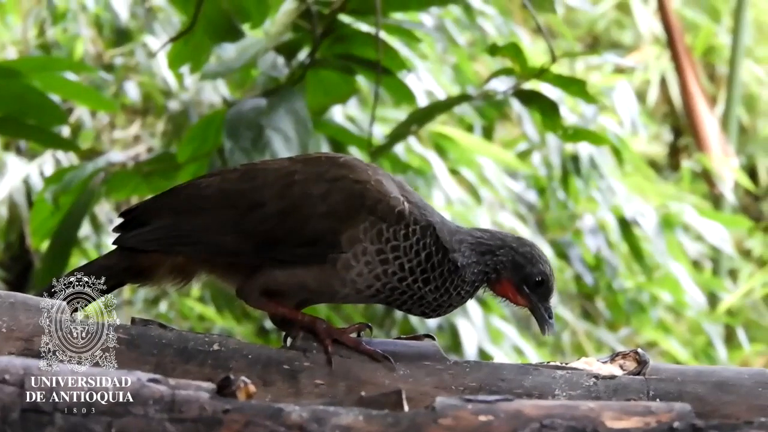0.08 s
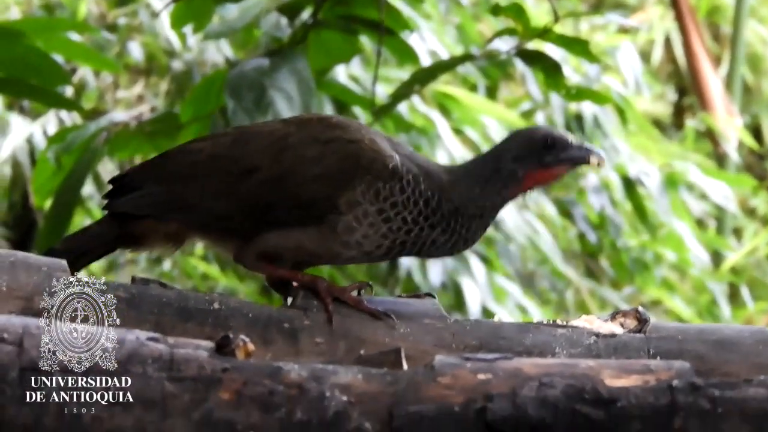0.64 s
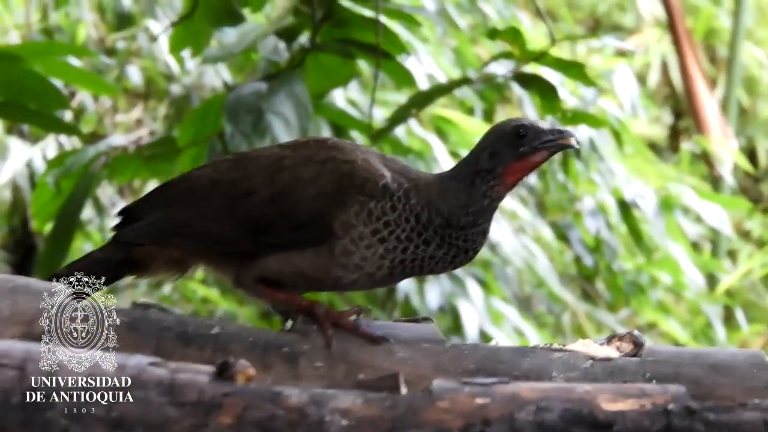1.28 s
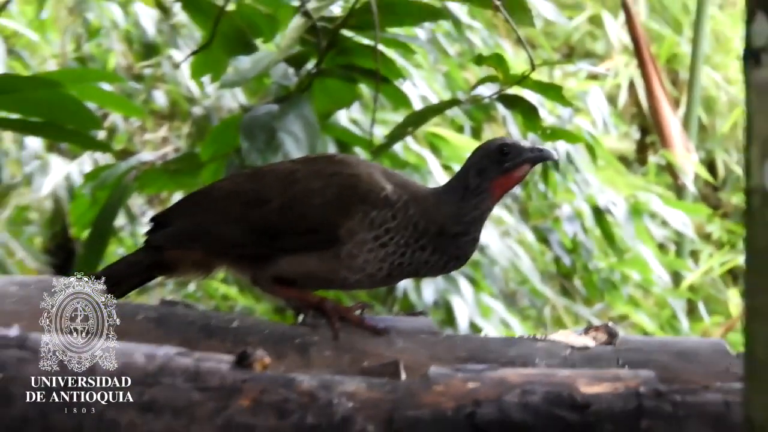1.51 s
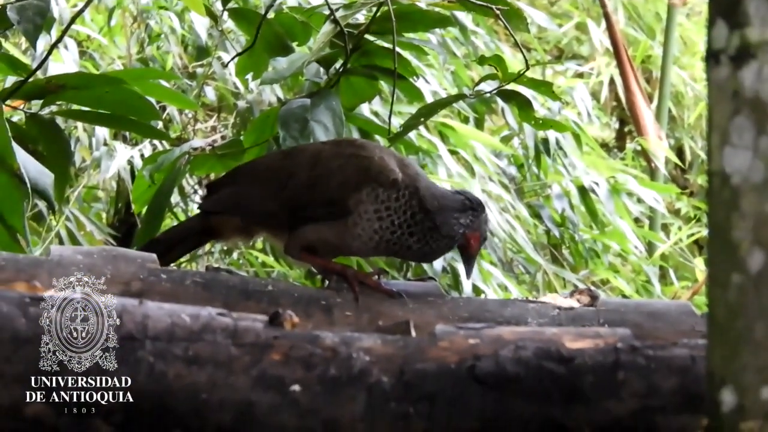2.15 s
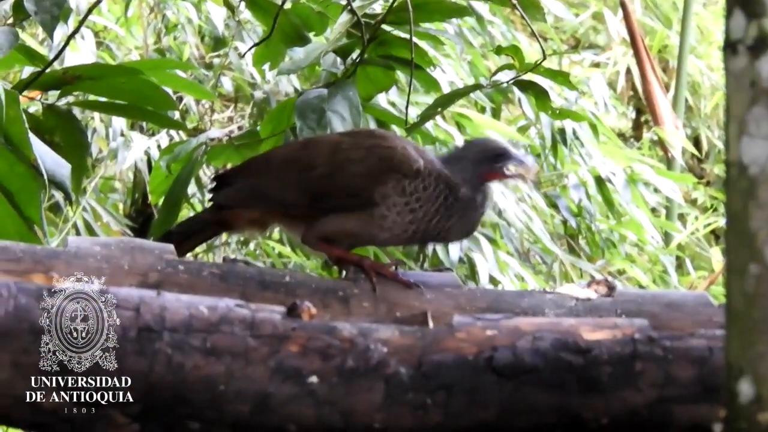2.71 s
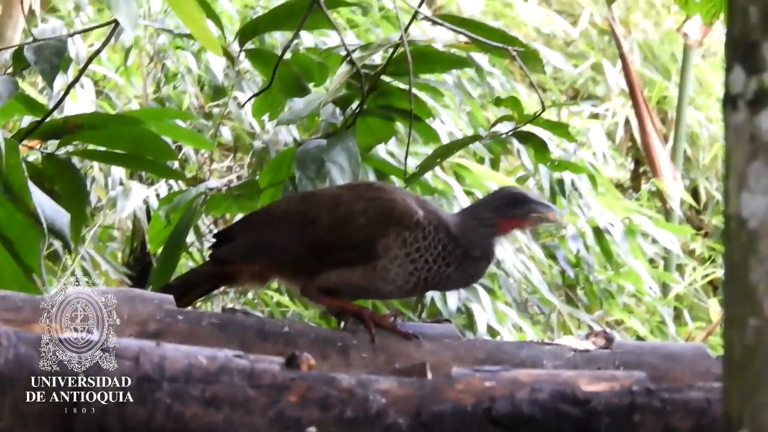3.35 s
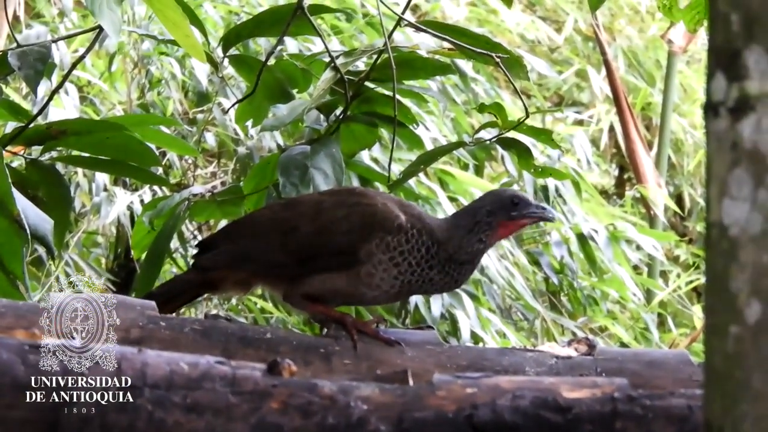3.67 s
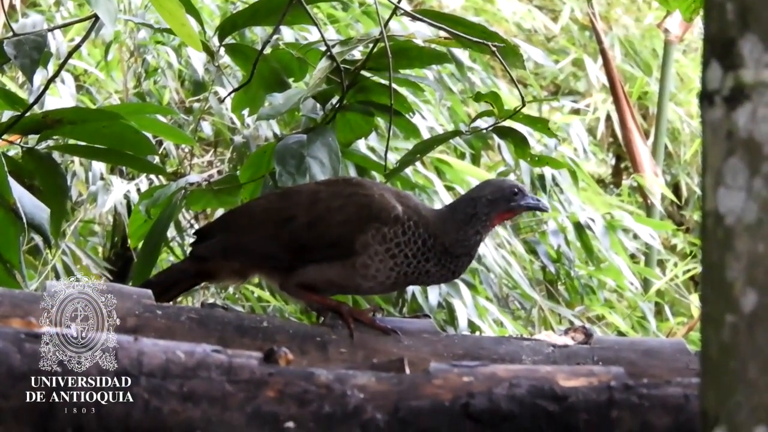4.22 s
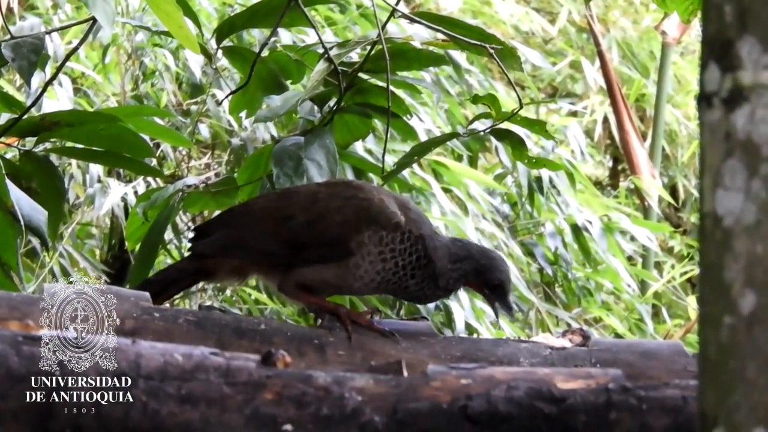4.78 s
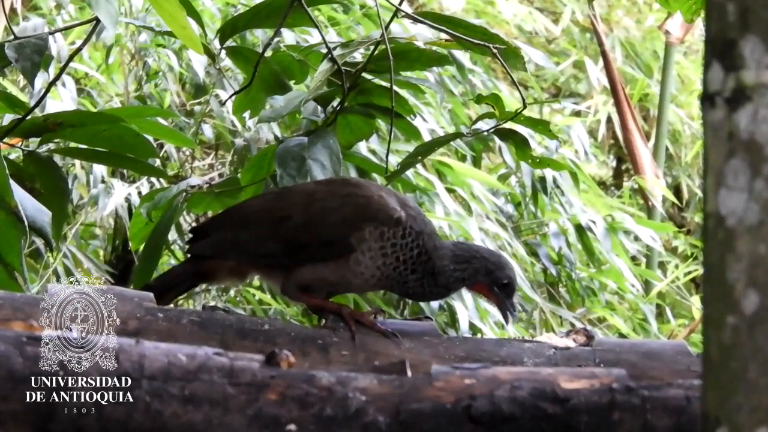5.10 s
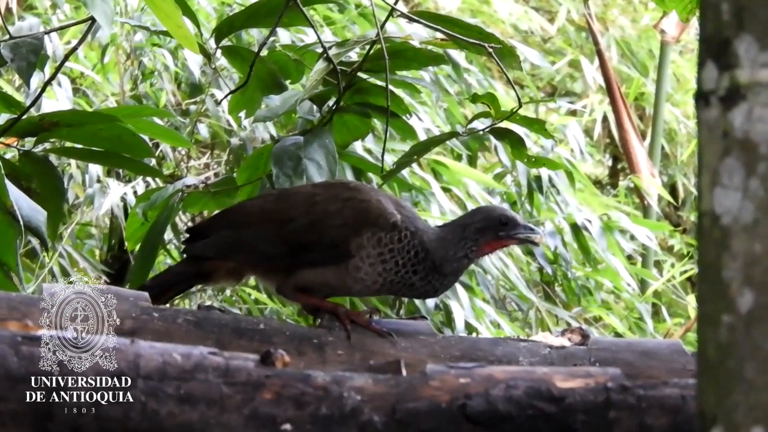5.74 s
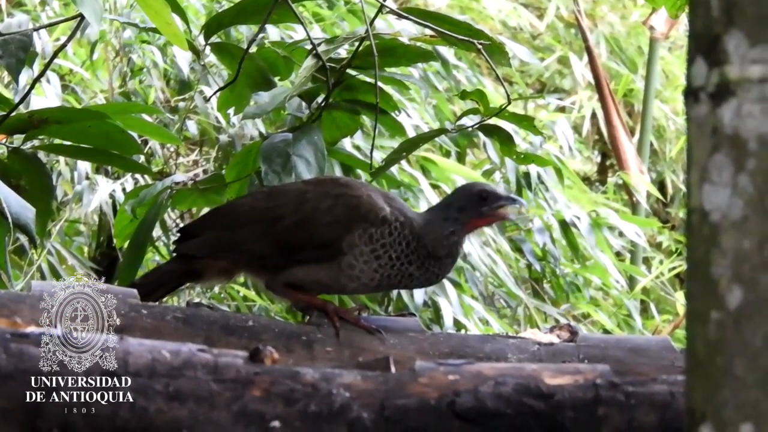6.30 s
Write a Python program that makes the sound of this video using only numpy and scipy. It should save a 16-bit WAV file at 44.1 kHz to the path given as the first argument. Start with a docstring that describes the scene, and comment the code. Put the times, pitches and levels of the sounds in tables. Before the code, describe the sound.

Heard from one spot among the trees, two birds squawk back and forth, a hoarse voice overlapping a shriller honking one, each giving a lone note and then a quick rasping cluster. A feeding bird taps dryly on a log at the start, again with a single knock about a second in, and once more near the end. A high insect drone and the soft rush of distant water and leaves continue behind.

```python
"""A quick run of dry taps from a feeding bird, then two chachalacas duet in a humid forest.
A hoarse low voice and a shriller one trade short rasping syllables: syrinx pulses ringing in the throat.
Timber near the microphone scatters the calls, and the foliage behind gives them a bright tail.
The feeding bird taps again and knocks once on a log; leaves brush, and there are two soft low bumps.
Insects drone near 6 kHz throughout, over the rush of distant water and leaves."""
import sys
import numpy as np
from scipy import signal
from scipy.fft import rfft, irfft
from scipy.io import wavfile
from scipy.ndimage import uniform_filter1d

SR = 44100
rng = np.random.default_rng(int(sys.argv[2]) if len(sys.argv) > 2 else 0)


def transcribe(u):
    """Save the signal u as a 16-bit wav file named by the first command-line argument.

    u: samples, shape (n,) or (channels, n), limited to [-1, 1]; the rate is SR.
    q: integer samples, one column per channel.
    """
    v = np.clip(np.atleast_2d(u).T, -1, 1)
    q = np.round(v * 32767).astype(np.int16)
    wavfile.write(sys.argv[1], SR, q)


N = 289296
TIME = np.arange(N) / SR
FREQ = np.arange(N // 2 + 1) * SR / N

# Levels in the tables are relative.
# low bird, a lone note and then "cha-cha-laac":
# t/s, length/s, level/dB, swell/(dB/s), rasp/dB, beak opening/0-1
LOW_SYLLABLES = [ (0.218, .14, -17, 20, -5, 0.85), (0.564, .13, -16, 35, -7, 0.9),
                 (0.736, .102, -16, -20, -3.5, 0.1), (0.843, .185, -17.5, -62, -7, 0.66),
                 (1.595, .17, -18.5, -4, -7, 1), (1.996, .112, -14.5, -1, -7.5, 0.5),
                 (2.136, .084, -15.5, 2, -3.5, 0.6), (2.252, .228, -17.5, -46, -8, 0.5),
                 (3.044, .152, -15.5, -7, -7, .75), (3.403, .122, -15.5, 76, -4, 0.6),
                 (3.56, .083, -14.5, 13, -4.5, .2), (3.657, .254, -18.5, -43, -7, 0.4),
                 (4.486, .154, -16.5, -16, -6, 0.8), (4.811, .135, -15.5, 70, -5.5, 0.4),
                 (4.99, .081, -14.5, 10, -5, .12), (5.092, .245, -18.5, -29, -7, 0.35),
                 (5.972, .178, -16, -8, -5.5, 0.6), (6.321, 0.13, -15.5, 16, -4.5, 0.64),
                 (6.499, 0.158, -15.5, 15, -3, 0.5), ]
# its throat with the beak shut, with it open, and its rasp: f/Hz, width/Hz, level/dB
LOW_THROAT_SHUT = [(677, 180, 3.5), (900, 250, 1.5), (1190, 120, -12), (1740, 880, -22), (2080, 610, -5),
                   (3300, 1080, -8.5)]
LOW_THROAT_OPEN = [(664, 230, -4.5), (912, 250, 4.5), (1140, 460, -9), (1750, 700, -15.5), (2220, 660, -6),
                   (3280, 750, -9)]
LOW_RASP = [(2600, 210, -14), (3670, 330, -23.5), (4600, 810, 8), (5485, 630, 8.5), (6200, 3700, 0.5),
            (8780, 1270, -5), (10800, 300, -6.5)]
# shrill bird, a lone honk, a pause, three short notes and a longer one:
# t/s, length/s, level/dB, swell/(dB/s), rasp/dB, second harmonic f/Hz
SHRILL_SYLLABLES = [ (0.383, 0.11, -11, -25, -7.5, 1300), (0.675, 0.062, -13, 0, -5.5, 1285),
                    (0.775, 0.074, -16, -12, -4, 1275), (0.855, 0.079, -15, -100, -3, 1295),
                    (0.924, 0.11, -13.5, -14, -7, 1320), (1.642, 0.13, -14.5, -24, -6, 1300),
                    (1.934, 0.087, -15, 135, -7.5, 1275), (2.07, 0.05, -13.5, 0, -3.5, 1310),
                    (2.143, 0.05, -14.5, 0, -4, 1330), (2.206, 0.1, -14, -12, -3, 1320),
                    (2.78, 0.12, -13.5, -19, -7.5, 1290), (3.094, 0.056, -15, 90, -10, 1310),
                    (3.219, 0.053, -17.5, 0, 1.5, 1270), (3.291, 0.062, -10, -90, -2.5, 1340),
                    (3.359, 0.075, -12.5, -90, -5, 1330), (4.074, 0.13, -13, -62, -9.5, 1295),
                    (4.371, 0.093, -16, 62, -7, 1320), (4.508, 0.055, -17.5, -8, -9, 1250),
                    (4.579, 0.065, -13, 20, -3, 1340), (4.658, 0.086, -13, 10, -4, 1335),
                    (5.38, 0.12, -12.5, -35, -7.5, 1295), (5.678, 0.08, -15.5, 85, -5, 1300),
                    (5.813, .054, -12.5, 0, -3, 1265), (5.886, 0.065, -11, -50, -3, 1280),
                    (5.963, 0.088, -14.7, -90, -4, 1315), ]
# its throat and rasp resonances: f/Hz, width/Hz, level/dB
SHRILL_THROAT = [(706, 730, -25), (1173, 350, -2), (1604, 315, -2), (2280, 140, -13.5)]
SHRILL_RASP = [(3207, 790, 2.5), (4690, 1100, -5), (5420, 1300, -10.5), (7550, 2300, -20.5)]
# what the foliage sends back: f/Hz, level/dB
FOLIAGE = [(700, -18), (1400, -8.5), (3200, -5), (5000, -3.5), (9000, -6)]
# dry taps of the feeding bird: t/s, level/dB, ring f/Hz, t60/s, share of ring/0-1
TAPS = [ (0.0626, -1, 3030, 0.017, 0.7), (0.086, 0, 2900, 0.016, 0.73), (0.0983, -1, 3020, 0.015, 0.63),
        (0.1094, 6, 2590, 0.0047, 0.53), (0.1135, -2, 2600, 0.022, 0.68), (0.1404, 5, 990, 0.011, 0.39),
        (0.1618, -4.5, 2900, 0.0037, 0.7), (1.0355, -10, 1710, 0.0076, 1), (1.233, -0.5, 5080, 0.021, 0.48),
        (1.245, -7, 3510, 0.019, 0.4), (1.261, -10, 3740, 0.032, 0.45), (6.2247, 4, 1850, 0.0035, 0.73),
        (6.229, 3.5, 3180, 0.0035, 0.85), (6.259, -12, 3000, 0.011, 0.75), ]
# modes of the log: f/Hz, level/dB, t60/s
LOG_MODES = [(380, 1, 0.23), (1150, -0.5, 0.11), (2600, -1.5, 0.092), (2860, -5, 0.08), (4200, -1, 0.058)]
# soft low bumps and brushing leaves: centre t/s, level/dB, half-length/s
BUMPS = [(.83, -29, 0.021), (6.24, -30, 0.029)]
RUSTLES = [(1.11, -40, 0.045), (1.235, -30, 0.027), (1.49, -33.5, 0.044)]
# noise bands of the bumps, the leaves and the insect haze: f/Hz, width/Hz, level/dB
BUMP_BANDS = [(83.5, 74, -.81), (153, 140, -1.1)]
RUSTLE_BANDS = [(3536, 14000, -2), (8990, 7900, -4)]
HAZE_BANDS = [(6207, 410, 2), (6530, 480, -.5)]
# lines of the insect drone, one pulse rate apart with the carrier in the middle: level/dB
DRONE_LINES_DB = [-11, -2.5, 1.5, 1, -15]
# fainter insects: f/Hz, level/dB
THIN_TONES = [(5496, -45), (6875, -48)]
# spectrum of the distant rush: f/Hz, level/dB
RUSH_SPECTRUM = [(20, -26), (55, -7), (75, -12), (100, -6.5), (140, -11), (250, -3.5), (400, 1), (600, 1),
                 (1100, -1.5), (2000, -9.5), (3000, -19), (5000, -25), (8000, -27), (11000, -41),
                 (15000, -66)]
# the rush fades in: t/s, level/dB
RUSH_FADE_IN = [(.034, -60), (.046, -4.5), (.2, -5), (.38, 0)]

LOW_HZ, LOW_ARCH, LOW_WANDER = 310.9, .04, .085  # pitch; its mid-syllable lift and wander, as shares
LOW_ATTACK_S, LOW_RELEASE_S = .031, .038
LOW_RASP_ATTACK_S, LOW_RASP_LAG_S = .049, .0055
SHRILL_OVERSHOOT, SHRILL_SETTLE_S = .06, .02  # each note starts sharp by this share and settles
SHRILL_RISE, SHRILL_RASP_RISE = .23, .36  # build-up, as shares of a note's length
SHRILL_RELEASE_S, SHRILL_RASP_LAG_S = .019, .0036
KNOCK_S, KNOCK_DB = 1.234, -11.5
DRONE_HZ, DRONE_PULSE_HZ = 6191, 166
DRONE_DB, DRONE_DIP_DB, DRONE_CYCLE_S = -36, 6.5, 2.14
RUSH_DB, TOP_HZ = -24, 15700


def low_bird():
    """A hoarse voice through a long windpipe; the pitch arches over each syllable and the rasp trails."""
    age, length, db, swell_db, rasp_db, opening = current_syllable(LOW_SYLLABLES)
    voice = effort(age, length, swell_db, LOW_ATTACK_S, LOW_RELEASE_S)
    rasp = effort(age - LOW_RASP_LAG_S, length, swell_db, LOW_RASP_ATTACK_S, LOW_RELEASE_S)
    arch = np.sin(np.pi * np.clip(age / length, 0, 1))
    hz = LOW_HZ * (1 + LOW_ARCH * arch + LOW_WANDER * walk(18))
    source = syrinx(hz, jitter=.05, flutter_hz=80, flutter=.8, air_db=-8)
    beak_shut = resonate(source, LOW_THROAT_SHUT)
    beak_open = resonate(source, LOW_THROAT_OPEN)
    throat = (1 - opening) * beak_shut + opening * beak_open
    return undb(db) * (undb(3.5) * voice * throat + undb(rasp_db) * rasp * resonate(source, LOW_RASP))


def shrill_bird():
    """A cracked high voice; its second harmonic sits on the main throat resonance and rings out."""
    age, length, db, swell_db, rasp_db, partial_hz = current_syllable(SHRILL_SYLLABLES)
    voice = effort(age, length, swell_db, SHRILL_RISE * length, SHRILL_RELEASE_S)
    rasp = effort(age - SHRILL_RASP_LAG_S, length, swell_db, SHRILL_RASP_RISE * length, SHRILL_RELEASE_S)
    rasp *= undb(rasp_db)
    sharp = SHRILL_OVERSHOOT * np.exp(-np.maximum(age, 0) / SHRILL_SETTLE_S)
    hz = partial_hz / 2 * (1 + sharp)
    source = syrinx(hz, jitter=.045, flutter_hz=155, flutter=.9, air_db=-5)
    ring = np.sqrt(2) * sine(2 * hz * (1 + .02 * walk(130)))
    clear = np.clip(1.05 - 2.23 * rasp, .2, 1)  # the clear partial breaks up as the rasp grows
    throat = resonate(source, SHRILL_THROAT) + clear * ring
    return undb(db) * (undb(1) * voice * throat + undb(.6) * rasp * resonate(source, SHRILL_RASP))


def syrinx(hz, jitter, flutter_hz, flutter, air_db):
    """Uneven pulses whose strength flutters with a second membrane; air hisses once a cycle."""
    turns = np.cumsum(hz * (1 + jitter * walk(np.mean(hz) / 2))) / SR
    onsets = np.interp(np.arange(1, int(turns[-1])), turns, np.arange(N))
    places = onsets.astype(int)[:, None] + np.arange(-4, 6)  # each pulse is a ten-sample sinc
    pulses = np.bincount(places.ravel() % N, np.sinc(places - onsets[:, None]).ravel(), N)
    air = noise() * np.exp(-(turns % 1))
    membrane = sine(flutter_hz * (1 + .2 * walk(41)))
    return (unit(pulses) + undb(air_db) * unit(air)) * np.exp(flutter * membrane)


def current_syllable(rows):
    """Time since the latest syllable began, followed by that syllable's other columns."""
    rows = np.array(rows)
    latest = np.maximum(np.searchsorted(rows[:, 0], TIME) - 1, 0)
    start, *columns = rows[latest].T
    return TIME - start, *columns


def effort(age, length, swell_db, attack_s, release_s):
    """Shape of a syllable: a quick attack, a hold that swells or sags steadily, a quick release."""
    gate = np.clip(np.minimum(age / attack_s, (length - age) / release_s), 0, 1)
    return np.sin(np.pi / 2 * gate) * undb(swell_db * (np.clip(age, 0, length) - length / 2))


def forest(calls):
    """Calls reach the microphone directly, off nearby timber, and as a longer bright tail off leaves."""
    timber = echoes(calls, t60_s=.04, delay_s=0, colouring=.35)
    tail = echoes(calls, t60_s=.46, delay_s=.02, colouring=.4)
    foliage = colour(tail, undb(np.interp(FREQ, *np.transpose(FOLIAGE))))
    return undb(1) * (.45 * calls + .85 * timber) + foliage


def echoes(x, t60_s, delay_s, colouring):
    """A dense, dying cloud of reflections; colouring 0 leaves the timbre alone, 1 combs it fully."""
    age = np.maximum(TIME[:SR] - delay_s, 0)
    spectrum = rfft(rng.standard_normal(SR) * (1 - np.exp(-age / .004)) * undb(-60 * age / t60_s))
    cloud = irfft(spectrum / np.abs(spectrum) ** (1 - colouring), SR)[:SR * 3 // 4]
    return signal.fftconvolve(x, cloud / np.linalg.norm(cloud))[:N]


def taps():
    """Each tap of the feeding bird is a brief broadband crack and a quickly damped ring."""
    out, age = np.zeros(N), TIME[:SR // 10]
    for s, db, hz, t60, share in TAPS:
        crack = signal.lfilter([.7], [1, -.55], rng.standard_normal(len(age)))
        ring = np.sin(2 * np.pi * hz * age)
        start = int(s * SR)
        out[start:start + len(age)] += undb(db - 60 * age / t60) * (share * ring + (1 - share) * crack)
    return out


def knock():
    """One padded blow rings the log."""
    age = np.maximum(TIME - KNOCK_S, 0)
    push = 1 - np.exp(-age / .0056)
    ring = sum(undb(db - 60 * age / t60) * np.sin(2 * np.pi * hz * age) for hz, db, t60 in LOG_MODES)
    return undb(KNOCK_DB) * push * ring


def swells(events, bands):
    """Short soft swells of coloured noise: low for a bump, high and wide for brushing leaves."""
    envelope = sum(undb(db) * np.exp(-((TIME - s) / half_s) ** 2) for s, db, half_s in events)
    return envelope * resonate(noise(), bands)


def insects():
    """A pulsed carrier with sidebands that swells in slow cycles, an insect haze and two thin tones."""
    def tone(hz, waver_hz):
        return np.sqrt(2) * sine(hz + waver_hz * walk(40)) * undb(2.5 * walk(24))
    carrier_hz = DRONE_HZ + 4 * walk(43.6)
    drone = sum(undb(db) * tone(carrier_hz + DRONE_PULSE_HZ * k, waver_hz=5.62)
                for k, db in enumerate(DRONE_LINES_DB, start=-2))
    dip = np.cos(np.pi * TIME / DRONE_CYCLE_S) ** 4
    haze = undb(-34.5) * resonate(noise(), HAZE_BANDS)
    thin = sum(undb(db) * tone(hz, waver_hz=8.9) for hz, db in THIN_TONES)
    fade_in = np.clip(TIME / .23, 0, 1) ** 2
    return fade_in * (undb(DRONE_DB - DRONE_DIP_DB * dip) * drone + haze + thin)


def rush():
    """Water and leaves far from the microphone, wavering a little."""
    hz, db = np.transpose(RUSH_SPECTRUM)
    gain = undb(np.interp(np.log(FREQ + 1), np.log(hz), db))
    fade_db = np.interp(TIME, *np.transpose(RUSH_FADE_IN))
    waver_db = 1.2 * walk(15)
    return unit(colour(noise(), gain)) * undb(RUSH_DB + fade_db + waver_db)


def resonate(x, modes):
    """Pass through steep resonances (f/Hz, width/Hz, level/dB); rms 1."""
    power = sum((undb(db) / (1 + ((FREQ ** 2 - hz ** 2) / (width * FREQ + 1)) ** 2)) ** 2
                for hz, width, db in modes)
    return unit(colour(x, np.sqrt(power)))


def colour(x, gain):
    """Causal filter with the given gain at each frequency."""
    cepstrum = irfft(np.log(gain + 1e-6), N)
    cepstrum[1:N // 2] *= 2
    cepstrum[N // 2 + 1:] = 0
    return irfft(rfft(x) * np.exp(rfft(cepstrum)), N)


def walk(rate_hz):
    """Smooth random wander of spread 1, rolling off above the rate."""
    return unit(irfft(rfft(noise()) * np.exp(-(FREQ / rate_hz) ** 2), N))


def sine(hz):
    """A sine that follows a moving pitch."""
    return np.sin(2 * np.pi * np.cumsum(hz) / SR)


def noise():
    """White noise of rms 1."""
    return rng.standard_normal(N)


def unit(x):
    """Scale to rms 1."""
    return x / np.sqrt(np.mean(x ** 2))


def undb(db):
    """Decibels to gain."""
    return 10 ** (np.asarray(db) / 20)


def scene():
    """From one spot among the trees: the duet, the small sounds at the log and the forest behind."""
    bumps = swells(BUMPS, BUMP_BANDS)
    rustles = swells(RUSTLES, RUSTLE_BANDS)
    duet = forest(low_bird() + shrill_bird())
    return (duet + insects() + taps() + knock() + bumps + rustles + rush())[None]


def record(dry):
    """Mono camera microphone: the loudest syllables are held down, peaks rounded, the top octave dulled."""
    power = uniform_filter1d(dry[0] ** 2, size=SR // 50)
    held = dry[0] / (1 + (power / undb(-7.5) ** 2) ** 2) ** (1 / 4)
    rounded = held / (1 + held ** 8) ** (1 / 8)
    dull = colour(rounded, undb(np.interp(FREQ, [10000, 12000, 15000], [0, -8, -30])))
    return signal.sosfilt(signal.ellip(8, .2, 70, TOP_HZ, fs=SR, output="sos"), dull)[None]


dry = scene()
out = record(dry)
transcribe(out)
```